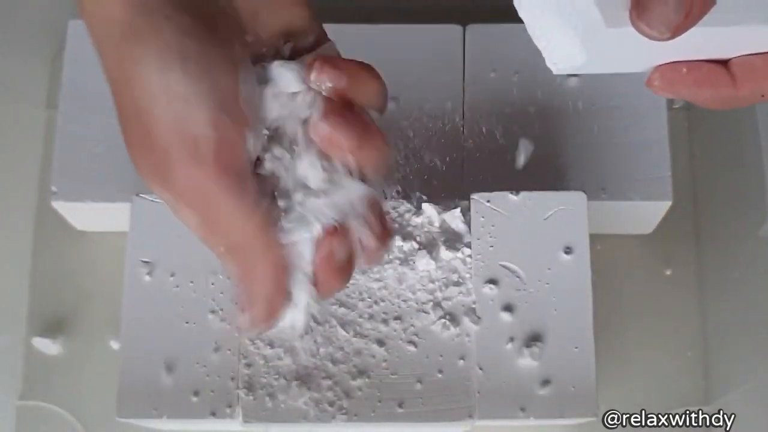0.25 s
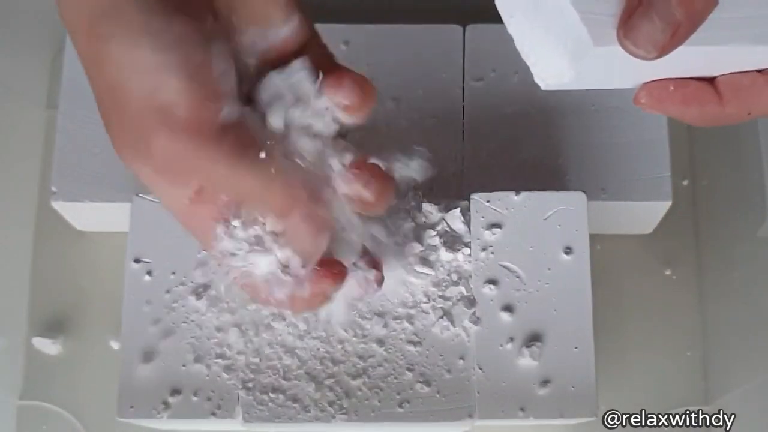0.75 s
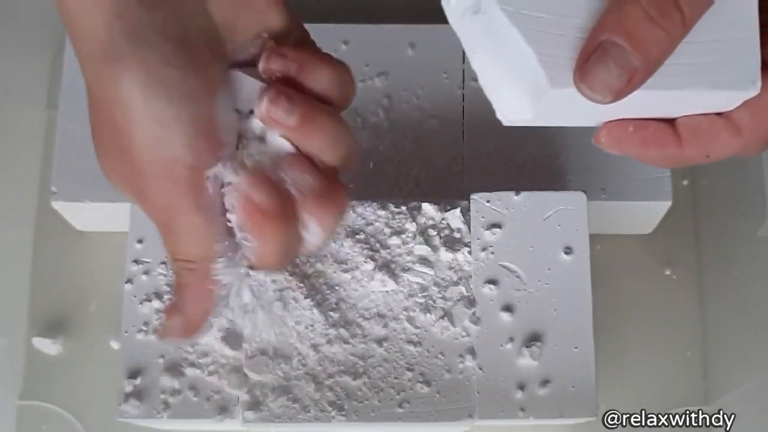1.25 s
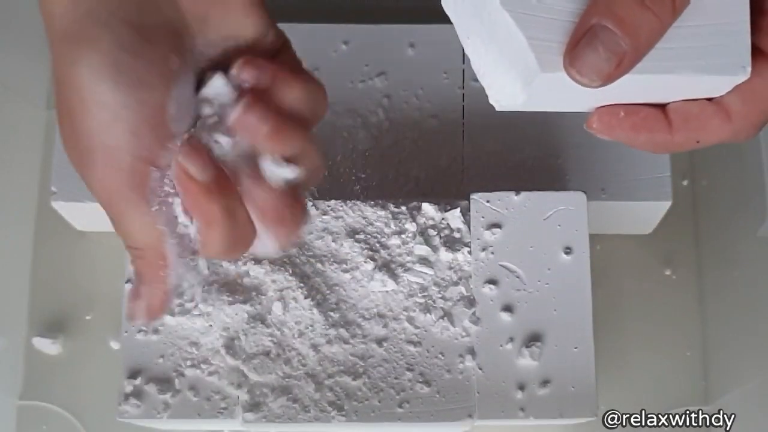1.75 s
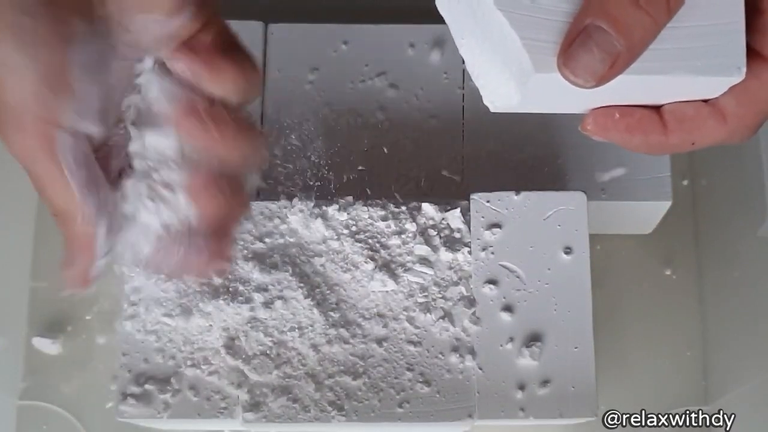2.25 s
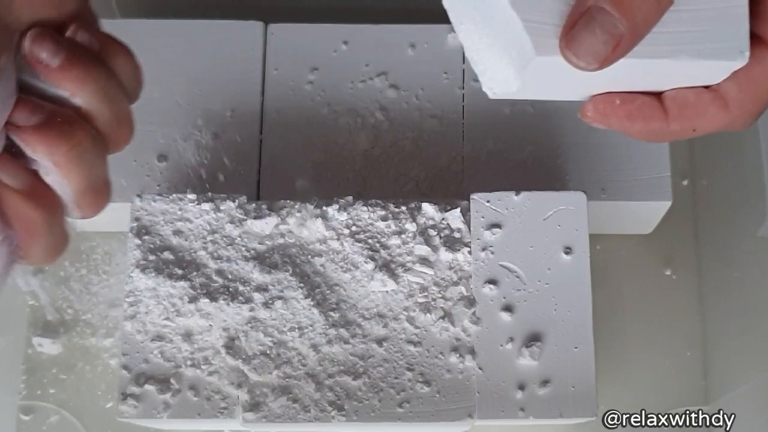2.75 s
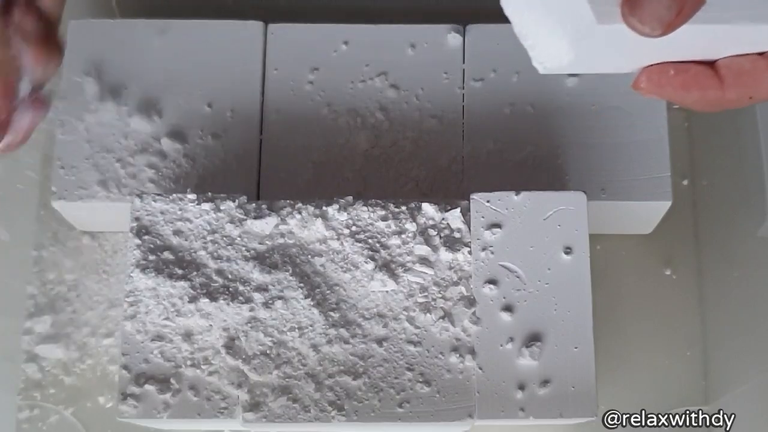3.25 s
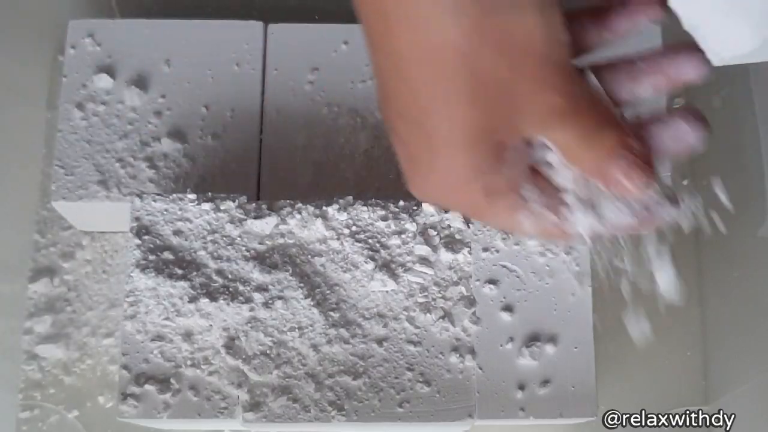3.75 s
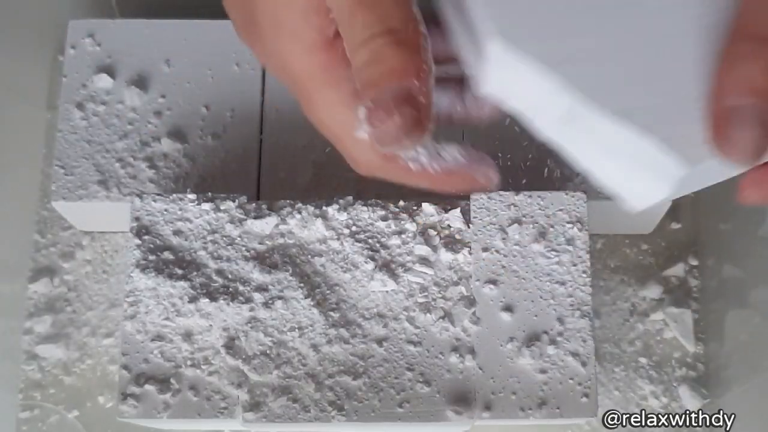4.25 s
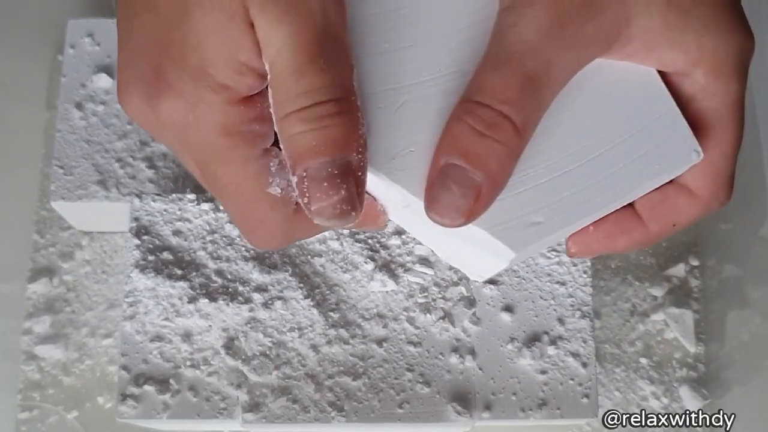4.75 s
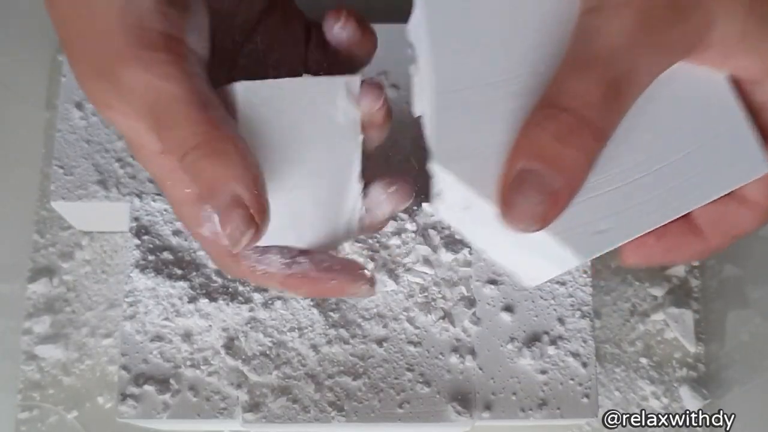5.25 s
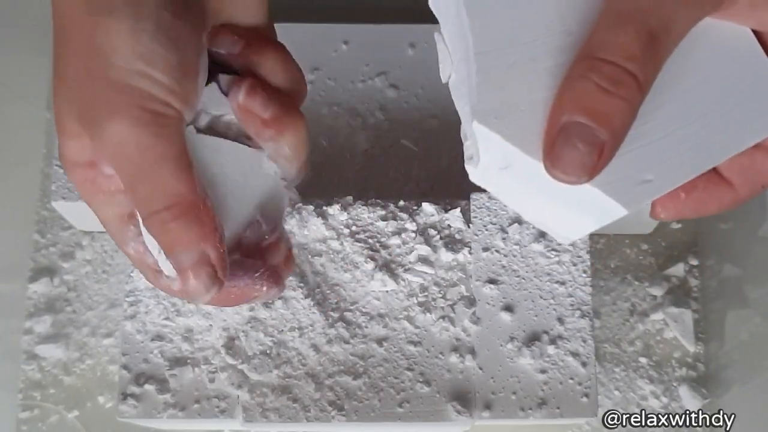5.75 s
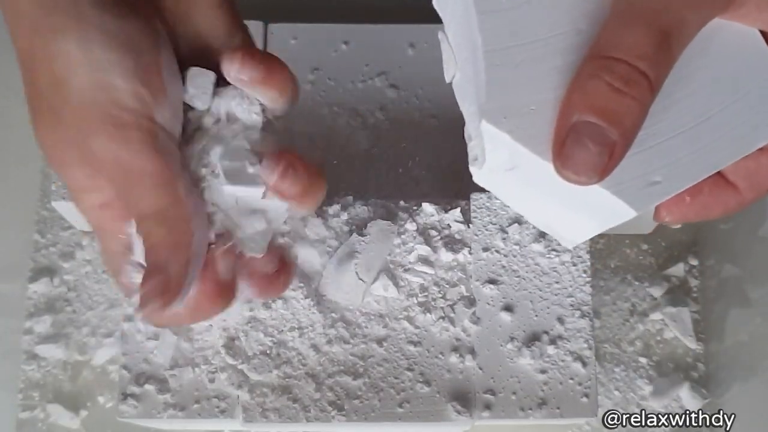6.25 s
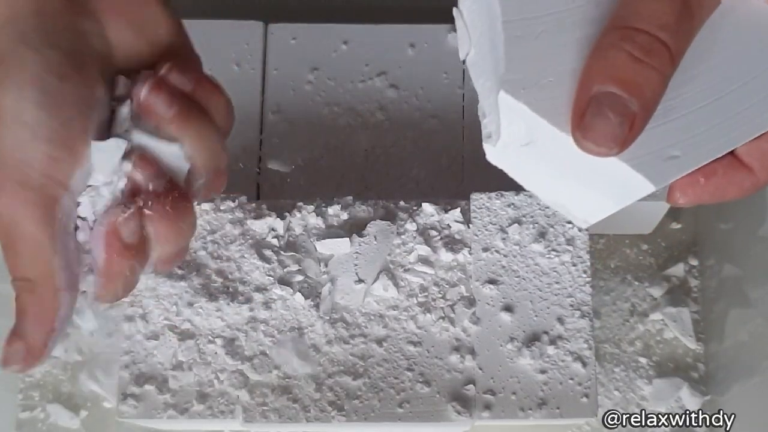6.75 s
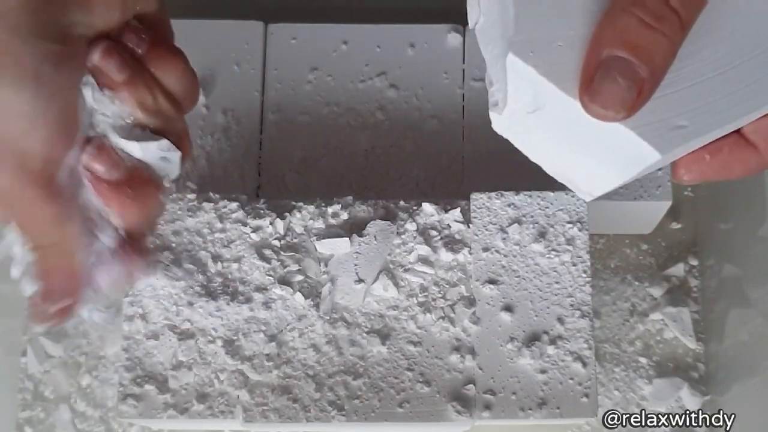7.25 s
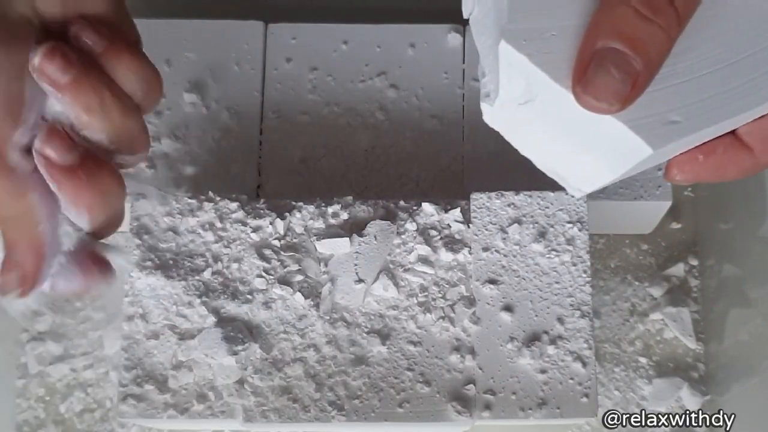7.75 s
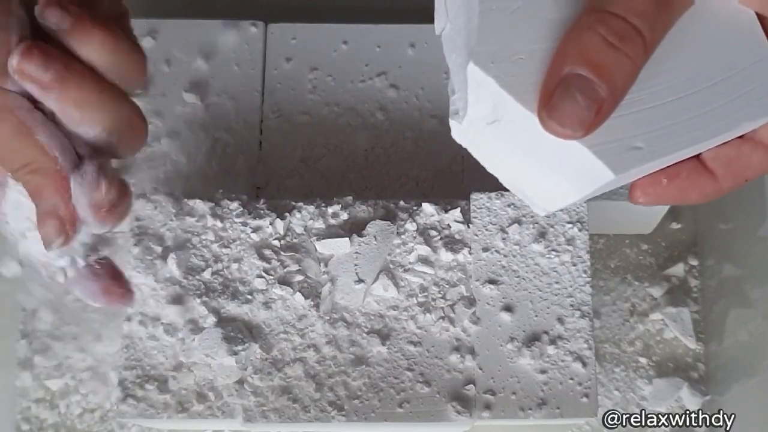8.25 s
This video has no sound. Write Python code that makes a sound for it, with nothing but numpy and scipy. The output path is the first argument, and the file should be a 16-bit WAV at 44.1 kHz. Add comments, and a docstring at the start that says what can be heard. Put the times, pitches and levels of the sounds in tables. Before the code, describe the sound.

A hand crushes dry chalk close to the microphone. For the first three and a half seconds, uneven squeezes make gritty crunches, sharp little cracks and a powdery hiss, while crumbs trickle and occasional lumps knock on slabs below. Around 4 seconds comes a louder crunch with a cluster of dull knocks. It then goes quieter, with faint swishes of dusty fingers on chalk. At 5 seconds a piece snaps off a block with a short crack and a low thump. After a few small ticks, the piece splits loudly in the fist at about 5.7 seconds, followed by a quick run of cracks and clinking flakes. Crunchy squeezing continues until the end at about 8.5 seconds, with heavier knocks around 6.9 and 7.4 seconds. The room is small and quiet, with slight reverberation and a faint, steady low rumble.

```python
"""In a small quiet room, a hand close by crushes dry chalk, snaps a piece off a block and crushes that too.
Brittle fracture releases stored strain as short cracks, pitched by the size of the fragment. With every
squeeze crumbs crunch, powder hisses and small chips break off. Big pieces knock on the slabs below,
flakes clink and dusty fingers swish. The room adds a faint reverberation and a steady low rumble."""
import sys
import numpy as np
from scipy import signal
from scipy.fft import rfft, irfft, next_fast_len
from scipy.io import wavfile
from scipy.ndimage import map_coordinates

SR = 44100
rng = np.random.default_rng(int(sys.argv[2]) if len(sys.argv) > 2 else 0)


def log_audio(samples):
    """Write samples as a 16-bit WAV file to the path given in sys.argv[1]."""
    # one column per channel
    frames = np.atleast_2d(samples).T
    # limit to full scale, then quantise
    limited = np.clip(frames, -1, 1)
    pcm = np.round(limited * 32767).astype(np.int16)
    wavfile.write(sys.argv[1], SR, pcm)


N = 374850
BURST = 4096  # samples in one transient
BURST_T = np.arange(BURST) / SR
BURST_HZ = np.fft.rfftfreq(BURST, 1 / SR) + 1


def amp(db):
    """Amplitude ratio of a level in decibels."""
    return 10 ** (np.asarray(db) / 20)


def unit(x):
    """Normalisation to rms 1."""
    return x / np.sqrt(np.mean(x ** 2) + 1e-20)


def unit_burst(x):
    """Energy normalisation: a transient of 0 dB has the energy of 10 ms at rms 1."""
    return x / np.linalg.norm(x) * np.sqrt(SR / 100)


def along(points, hz):
    """Interpolation of (f/Hz, value) points on a logarithmic frequency axis."""
    f, v = np.transpose(points)
    return np.interp(np.log(hz + 1), np.log(f), v)


def add(track, s, sound):
    """Superposition of a sound on the track at time s."""
    part = track[max(round(s * SR), 0):][:len(sound)]
    part += sound[:len(part)]


def filtered(x, gain):
    """Zero-phase filtering: the spectrum of x is multiplied by gain(f)."""
    m = next_fast_len(N + SR // 2)
    return irfft(rfft(x, m) * gain(np.fft.rfftfreq(m, 1 / SR)), m)[:N]


def noise(spectrum):
    """Spectral shaping of white noise by (f/Hz, level/dB) points; rms 1."""
    return unit(filtered(rng.standard_normal(N), lambda hz: amp(along(spectrum, hz))))


def wobble(rate):
    """Smooth random modulation: a spline through rate knots a second."""
    knots = rng.standard_normal(int(N * rate / SR) + 4)
    return map_coordinates(knots, [np.arange(N) * rate / SR], order=2)


def resonance(centre_hz, q):
    """Magnitude response of a damped resonator."""
    return 1 / np.sqrt(1 + (q * (BURST_HZ / centre_hz - centre_hz / BURST_HZ)) ** 2)


def burst(gain, t60, spike):
    """Transient response: an impulse and its uneven decaying scatter excite a minimum-phase filter."""
    clumps = np.interp(np.arange(BURST), np.linspace(0, BURST, 90), rng.standard_normal(90))
    push = rng.standard_normal(BURST) * amp(2.8 * clumps)
    push *= amp(-60 * BURST_T / max(t60, .002))
    push /= np.linalg.norm(push)
    push[0] += spike * rng.choice([-1, 1])
    cepstrum = irfft(np.log(gain + 1e-6))
    cepstrum[1:BURST // 2] *= 2  # folding the cepstrum makes the filter causal
    cepstrum[BURST // 2 + 1:] = 0
    return unit_burst(irfft(rfft(push) * np.exp(rfft(cepstrum))))


def ring(modes):
    """Free vibration: modes (f/Hz, level/dB, T60/s) struck at once decay exponentially."""
    return unit_burst(sum(
        amp(db - 60 * BURST_T / t60) * np.sin(2 * np.pi * hz * BURST_T) * rng.choice([-1, 1])
        for hz, db, t60 in modes))


def grains(spectrum, rate, spread, centre_hz, scatter, q, t60, shapes=12):
    """Shot noise: about rate tiny breaks a second, mostly weak, a few strong; rms 1."""
    out = np.zeros(N)
    colour = amp(along(spectrum, BURST_HZ))
    for _ in range(shapes):
        hz = centre_hz * np.exp(scatter * rng.standard_normal())
        grain = burst(colour * resonance(hz, q), t60, spike=.6)[:BURST // 4]
        when, size = rng.random((int(rate * N / SR / shapes), 2)).T
        strength = amp(-spread * np.log(0.031 + size))  # crumbs can only grow so large
        impulses = np.bincount((when * N).astype(int), strength, N)
        out += signal.oaconvolve(impulses, grain)[:N]
    return unit(out)


# spectrum of the room's background: f/Hz, level/dB
AIR = [(15, -47), (27, -27.5), (38, -5), (48, 1.5), (58, -9.5), (76, -6), (115, -5), (155, -20),
       (195, -4.5), (235, -18), (275, -20), (350, -26), (700, -37), (1020, -28), (1300, -45.5),
       (1750, -40.5), (2700, -53), (8000, -39.5), (16000, -66)]

def room_rumble():
    """Stationary noise, strongest at low frequencies, sets the noise floor."""
    return amp(-56.5) * noise(AIR)


# the fist closing on the crumbs: t/s, hold/s, coarse level/dB, fine level/dB
SQUEEZES = [ (0.0, 0.11, -46, -43.5), (0.16, 0.038, -48.5, -43), (0.38, 0.16, -53, -46.5),
            (0.58, 0.1, -44, -48.5), (0.87, 0.29, -51.5, -48.5), (1.26, 0.033, -52, -50),
            (1.41, 0.072, -48.5, -63), (1.6, .23, -53.5, -52.5), (1.97, 0.17, -51, -50.5),
            (2.19, 0.072, -46, -45.5), (2.3, .14, -47.5, -47.5), (2.53, 0.14, -45.5, -41.5),
            (2.75, 0.093, -52.5, -51.5), (3.13, 0.17, -49.5, -48), (3.37, 0.11, -50, -52),
            (3.96, 0.047, -48.5, -47.5), (4.06, .08, -36.5, -46.5), (4.17, 0.078, -47.5, -57.5),
            (5.02, 0.15, -63, -59), (5.57, 0.11, -55, -48), (5.75, 0.063, -49, -41.5),
            (5.92, .2, -52, -44.5), (6.17, 0.06, -43, -52), (6.28, .06, -46.5, -41.5),
            (6.44, 0.26, -45, -41), (6.8, 0.16, -46, -46), (7.08, 0.084, -40, -38),
            (7.25, 0.095, -45.5, -43), (7.44, 0.088, -45.5, -46.5), (7.62, 0.16, -45, -43.5),
            (7.81, 0.17, -47, -45.5), (8.14, 0.16, -57, -49.5), (8.32, 0.12, -48, -59),
            (8.43, 0.065, -39.5, -48)]
# loose crumbs shifting between squeezes: t/s, hold/s, coarse level/dB, fine level/dB
TRICKLES = [ (0.0, 1.83, -59.5, -57.5), (2.0, .85, -59, -53), (2.95, .65, -61.5, -58.5),
            (3.68, 0.76, -71, -59), (4.42, .22, -81.5, -71.5), (5.15, .4, -75.5, -66), (5.6, 2.9, -68, -63)]

def crumbling_gains(attack_s=0.067, release_s=0.099, build_db=1):
    """Incoherent sources add in power: all movements sum to one coarse and one fine envelope."""
    t, power = np.arange(0, N, 64) / SR, 0
    for start, hold, coarse_db, fine_db in [*SQUEEZES, *TRICKLES]:
        early, late = np.maximum(start - t, 0), np.maximum(t - start - hold, 0)
        build = np.clip((t - start) / hold, 0, 1) - .5  # pressure grows through the hold
        shape_db = build_db * build - 20 * (early / attack_s + late / release_s)
        power = power + amp([coarse_db + shape_db, fine_db + shape_db]) ** 2
    return [np.interp(np.arange(N) / SR, t, np.sqrt(p)) for p in power]


# spectra of coarse crumbs and of fine powder: f/Hz, level/dB
CRUMBS = [(60, 1), (200, 0), (450, 0.5), (750, -4), (1100, 2), (1600, -3.5), (2500, -7), (5000, -11.5),
          (12000, -40.5)]
POWDER = [(200, -26), (1000, -14.5), (2500, -7), (4000, -2.5), (7500, -1.5), (10000, -4.5), (13000, -14),
          (16000, -27.5)]

def kneading(coarse_gain, fine_gain):
    """Granular stick-slip: crumbs grind, chips tinkle and powder slides while the moving hand rumbles."""
    slips = amp(2.12 * wobble(60))
    coarse = grains(CRUMBS, rate=340, spread=6.5, centre_hz=1474, scatter=0.48, q=1.7, t60=0.025)
    coarse += amp(-6.5) * noise(CRUMBS)
    grit = grains(POWDER, rate=540, spread=5.8, centre_hz=5000, scatter=0.75, q=1.5, t60=0.0087)
    hiss = noise(POWDER)
    tinkle = grains(POWDER, rate=80, spread=6.5, centre_hz=4500, scatter=.3, q=50, t60=0.0024, shapes=8)
    hand = noise([(30, -27.5), (60, -2.5), (90, 2), (190, -5), (300, -8.5), (500, -15), (900, -40)])
    fine = amp(-1.5) * grit + amp(-7.5) * hiss + amp(-8) * tinkle + amp(-14.5) * hand
    return slips * (coarse_gain * coarse + fine_gain * fine)


# spectrum of breaking chalk: f/Hz, level/dB
CHALK = [(60, -2), (300, 5), (1000, 0.5), (2000, -0.5), (4000, 1), (5200, 0.5), (7500, 2.5), (10000, -3),
         (13000, -15.5), (16000, -27)]
# fractures that stand out of the crumbling: t/s, level/dB, centre f/Hz, nominal decay/s
CRACKS = [ (0.0975, -32.5, 4160, 0.012), (0.1513, -16.5, 6600, 0.025), (0.1624, -26, 4650, 0.0092),
          (0.1733, -35, 4170, .043), (0.2036, -34, 3070, .035), (0.2843, -40.5, 1290, 0.023),
          (0.4277, -42, 2890, 0.023), (0.392, -37, 5540, 0.031), (0.6088, -30.5, 5000, 0.017),
          (0.6683, -27, 5200, .012), (0.7789, -43.5, 2390, .037), (0.9464, -38, 1610, 0.043),
          (1.11, -31, 5400, 0.04), (1.1509, -31.5, 5100, .015), (1.2768, -42, 4500, .029),
          (1.3146, -38, 2300, .016), (1.3904, -22, 4160, 0.0087), (1.4473, -39, 1600, .006),
          (1.4935, -41, 2400, .011), (1.594, -38, 3220, .063), (1.6056, -34.5, 1190, .027),
          (1.6757, -30, 4200, 0.013), (1.6866, -32, 1420, 0.039), (1.9647, -37.5, 4700, .039),
          (2.1213, -33, 2100, 0.047), (2.1322, -29.5, 4280, 0.019), (2.171, -22.5, 2720, 0.021),
          (2.2163, -28.5, 1990, .016), (2.3405, -23, 3350, 0.0082), (2.4354, -20, 2470, 0.014),
          (2.517, -34, 2800, 0.034), (2.6432, -21.5, 4540, .003), (2.6565, -41, 3800, 0.01),
          (2.7711, -39.5, 2550, .044), (2.868, -38.5, 1820, 0.039), (2.9844, -42, 3660, 0.039),
          (3.0555, -45, 1490, 0.014), (3.1949, -32, 2040, 0.042), (3.2551, -28, 1750, 0.019),
          (3.305, -33.5, 1900, 0.011), (3.3225, -34, 5440, .021), (3.3462, -32.5, 3570, 0.016),
          (3.3939, -38.5, 3300, .04), (3.4141, -33.5, 920, 0.023), (3.4731, -34.5, 980, 0.0094),
          (3.5564, -41, 8450, 0.032), (3.8907, -34.5, 1750, 0.036), (3.9537, -24.5, 2800, 0.024),
          (4.0024, -30, 2200, .048), (4.081, -25, 1280, 0.026), (4.1026, -21.5, 1100, 0.092),
          (4.1135, -21, 1810, .02), (4.155, -33, 3980, .01), (4.201, -38, 2000, .014),
          (4.9333, -37.5, 2600, .018), (4.9845, -24.5, 6450, .029), (5.0184, -38, 1300, 0.018),
          (5.054, -35.5, 1560, 0.018), (5.145, -44.5, 2030, 0.028), (5.414, -46.5, 2090, 0.016),
          (5.4609, -39, 2470, .02), (5.4782, -36.5, 3720, 0.063), (5.5247, -38, 900, 0.039),
          (5.6718, -36, 3060, .038), (5.725, -11.5, 1560, 0.026), (5.78, -30.5, 1710, .019),
          (5.8005, -25, 2460, 0.013), (5.9051, -32, 1510, 0.077), (5.9122, -16, 1880, 0.029),
          (5.933, -32, 3200, .034), (5.952, -30, 6400, 0.045), (5.9855, -26, 4500, 0.068),
          (5.9958, -19.5, 2160, 0.028), (6.0593, -26.5, 2080, 0.049), (6.079, -22.5, 1660, 0.08),
          (6.1007, -31, 2900, 0.049), (6.1158, -27, 2290, .025), (6.4004, -35, 3000, 0.013),
          (6.4178, -35, 3900, .008), (6.453, -27, 1300, 0.029), (6.559, -33.5, 4300, .016),
          (6.614, -32.5, 5940, 0.075), (6.656, -33.5, 5100, .008), (6.674, -31.5, 2200, 0.036),
          (6.6929, -32.5, 3150, 0.2), (6.7906, -26.5, 1980, .02), (6.8218, -31.5, 3600, 0.016),
          (6.8466, -32, 3000, .005), (6.9143, -20, 870, 0.049), (6.9588, -34.5, 1700, .016),
          (7.0825, -25.5, 2300, 0.013), (7.1082, -31.5, 2920, .036), (7.1478, -36.5, 2200, .027),
          (7.178, -34, 5000, 0.017), (7.2595, -35, 2000, 0.013), (7.312, -36.5, 3100, .022),
          (7.4365, -25, 2360, 0.011), (7.4804, -22, 3180, 0.011), (7.5155, -36, 1900, 0.011),
          (7.6174, -30.5, 895, .048), (7.6864, -32, 1330, 0.029), (7.73, -31.5, 1700, .05),
          (7.8625, -33.5, 2480, .065), (8.0322, -36.5, 1940, 0.11), (8.325, -33, 1590, 0.014),
          (8.49, -32, 1390, 0.019)]

def cracks(rows=CRACKS, q=0.56):
    """Brittle fracture: a tick as it starts, a broad crack with a fleeting ring, then a splinter."""
    out = np.zeros(N)
    colour = amp(along(CHALK, BURST_HZ))
    for s, db, hz, decay in rows:
        lead, lag, splinter_pitch, ring_pitch = rng.random(4)
        body = colour * resonance(hz, q)
        fragment = 1 + amp(1) * resonance((hz + 1200) * 2 ** (ring_pitch - .5), q=13) ** 2
        splinter = colour * resonance(hz * (1 + splinter_pitch), q)
        add(out, s - .001 - .003 * lead, amp(db - 26) * burst(body, t60=0.012, spike=.2))
        add(out, s, amp(db) * burst(body * fragment, t60=decay * 0.84, spike=0.58))
        add(out, s + .003 + .009 * lag, amp(db - 14) * burst(splinter, t60=0.002, spike=.6))
    return out


def chips(effort, per_second=11, firm_db=-41, centre_hz=2600, octaves=0.57):
    """Fracture under load: chips break off at random times, louder the harder the hand presses."""
    rows = []
    for when, size, pitch, life in rng.random((int(per_second * N / SR), 4)):
        pressure_db = 20 * np.log10(effort[int(when * N)] + 1e-9) - firm_db  # 0 in a firm squeeze
        db = -39.5 + 1.23 * pressure_db + 3 * (2 * size - 1)
        hz = centre_hz * 2 ** (octaves * (2 * pitch - 1))
        rows.append((when * N / SR, db, hz, .022 * (.5 + life)))
    return cracks(rows)


# jolts of the hand and table: t/s, peak level/dB
THUMPS = [ (0.15, -42), (1.151, -30), (2.215, -39), (3.076, -43), (3.471, -36.5), (4.114, -25),
          (4.983, -20.5), (5.524, -33), (5.725, -37), (5.911, -26), (6.175, -30.5), (6.914, -24.5),
          (6.939, -32), (6.999, -32), (7.771, -35), (7.808, -34)]

def thumps(centre_hz=140):
    """Heavily damped response: the jolt of a break or landing gives one soft low push."""
    out = np.zeros(N)
    for s, db in THUMPS:
        push = burst(resonance(centre_hz, q=0.7) ** 2, t60=0.036, spike=0.79)
        add(out, s, amp(db) * push / np.abs(push).max())
    return out


# spectrum of a blow on the slabs: f/Hz, level/dB
SLAB = [(100, 1.5), (250, -2), (450, 4.5), (600, -2.5), (820, 1.5), (1300, 1.5), (2000, 1.5), (4000, 2)]
# modes of the slabs: f/Hz, level/dB, T60/s
SLAB_MODES = [(467, -10.5, 0.043), (708, -4, .06), (845, -0.5, 0.064), (1063, -2, 0.056),
              (1529, -10.5, .04)]
# blocks giving way and lumps landing: t/s, level/dB, centre f/Hz
KNOCKS = [ (0.591, -34.5, 970), (0.6096, -28, 1320), (0.6685, -30.5, 1610), (0.6812, -32.5, 950),
          (1.1507, -31, 704), (1.618, -37, 890), (2.3858, -30.5, 710), (2.4275, -29.5, 1140),
          (3.0772, -22.5, 855), (3.9538, -28.5, 1120), (4.0329, -27, 900), (4.0485, -27, 950),
          (4.0924, -29.5, 1300), (4.1132, -20, 814), (4.1554, -31, 1000), (4.218, -21.5, 1110),
          (4.984, -20.5, 666), (5.9534, -29.5, 1610), (6.1244, -26.5, 2200), (6.157, -34, 990),
          (6.176, -26, 744), (6.4462, -29, 690), (6.5845, -32.5, 1520), (6.8538, -17, 643),
          (7.0013, -22.5, 900), (7.3449, -18, 710), (7.4361, -20.5, 1020), (7.4563, -28, 700),
          (7.769, -24.5, 637), (7.9125, -30, 610), (8.1057, -33, 656), (8.3048, -35, 610),
          (8.326, -32, 510)]

def knocks():
    """Inelastic impact: a dull blow pitched by the lump's size; its edge ticks, the slabs ring briefly."""
    out = np.zeros(N)
    slab = amp(along(SLAB, BURST_HZ))
    edge = amp(along(CHALK, BURST_HZ)) * resonance(3500, q=0.92)
    for s, db, hz in KNOCKS:
        add(out, s, amp(db) * burst(slab * resonance(hz, q=0.67) ** 2, t60=0.027, spike=0.43))
        add(out, s, amp(-38) * burst(edge, t60=0.015, spike=.6))
        add(out, s, amp(db - 9) * ring(SLAB_MODES))
    return out


# thin flakes landing: t/s, level/dB, f/Hz
FLAKES = [(0.6925, -43, 2200), (2.34, -25.5, 3320), (2.396, -39, 2274), (2.868, -44, 2240),
          (3.194, -39, 5400), (3.631, -56, 2200), (5.5982, -36.5, 4280), (5.6248, -40, 4250),
          (5.9126, -19, 3620), (6.032, -43, 6950), (6.101, -30, 6840), (6.558, -31.5, 4960),
          (7.863, -37.5, 2350), (7.8627, -36, 4360), (8.2, -41, 4210), (8.24, -45.5, 4300)]

def flakes(t60=0.026):
    """Impact excitation: each flake clinks in a single damped mode."""
    out = np.zeros(N)
    for s, db, hz in FLAKES:
        add(out, s, amp(db) * ring([(hz, 0, t60)]))
    return out


# dusty fingers sliding on the block: middle t/s, duration/s, level/dB
RUBS = [(3.788, 0.14, -51.5), (4.465, 0.14, -54), (4.632, .11, -57.5), (5.277, 0.067, -46.5),
        (5.323, 0.071, -62.5), (5.402, 0.067, -51.5)]

def rubs():
    """Sliding friction: skin on smooth chalk makes a soft, high swish."""
    t = np.arange(N) / SR
    strokes = sum(amp(db) * np.cos(np.pi * np.clip((t - s) / length, -.5, .5)) for s, length, db in RUBS)
    swish = noise([(700, -27.5), (2100, -9), (2900, -20), (4300, 1), (5400, -1.5), (7800, 1),
                   (10500, -5.5), (13000, -18.5), (16000, -36)])
    return strokes * amp(2.4 * wobble(100)) * swish


# modes of the block and of the piece snapped off it: f/Hz, level/dB, T60/s
BLOCK_MODES = [(228, -10, 0.029), (470, -14.5, 0.038), (1023, 0, 0.024), (1820, -3.5, 0.013),
               (3130, -22.5, .022)]
PIECE_MODES = [(458, -2.5, 0.024), (1050, 2, 0.019), (1730, -9, .022), (2560, 0, 0.018), (3260, -7, 0.016),
               (3900, -13, 0.017)]

def snaps(break_s=4.9842, split_s=5.725):
    """Normal modes of whole solids: the block rings as it parts, the piece as it splits in the fist."""
    out = np.zeros(N)
    add(out, break_s, amp(-16.5) * ring(BLOCK_MODES))
    add(out, split_s, amp(-15.5) * ring(PIECE_MODES))
    return out


# reverberation time of the room: f/Hz, T60/s
ROOM_T60 = [(100, 0.56), (400, 0.62), (1000, 0.43), (2000, 0.41), (4000, 0.55), (12000, 0.27)]

def reverberation(x):
    """Diffuse-field decay: a faint tail dies exponentially in each band, the highest treble first."""
    hz, t, bands = signal.stft(rng.standard_normal(SR // 2), SR, nperseg=256)
    fade = amp(-60 * t / along(ROOM_T60, hz)[:, None])
    tail = signal.istft(bands * fade, SR, nperseg=256)[1]
    tail[:SR // 200] = 0  # the first reflection takes 5 ms
    wet = signal.fftconvolve(x, tail / np.linalg.norm(tail))[:N]
    colour = [(200, 0), (420, 1.5), (900, -5.5), (2000, -3), (6000, -8)]  # f/Hz, level/dB
    return filtered(wet, lambda f: amp(-16.5 + along(colour, f)))


def scene():
    """Superposition of the direct chalk sound, its reverberation and the room's rumble, in mono."""
    air = room_rumble()
    coarse, fine = crumbling_gains()
    chalk = kneading(coarse, fine) + cracks() + chips(effort=np.hypot(coarse, fine))
    chalk += thumps() + knocks() + flakes() + rubs() + snaps()
    return (chalk + reverberation(chalk) + air)[None]


def record(dry):
    """Soft saturation rounds the sharpest peaks; a steep low-pass limits the band."""
    ceiling, top_hz = .75, 16200
    rounded = dry[0] / (1 + (dry[0] / ceiling) ** 4) ** .25
    return filtered(rounded, lambda hz: 1 / (1 + (hz / top_hz) ** 120))[None]


dry = scene()
out = record(dry)
log_audio(out)
```